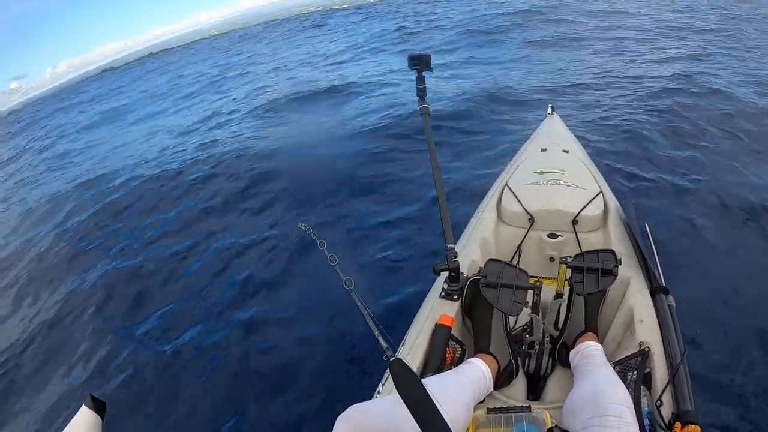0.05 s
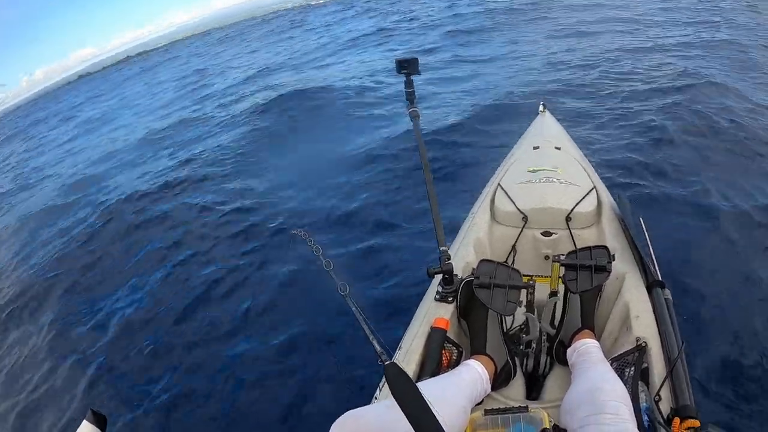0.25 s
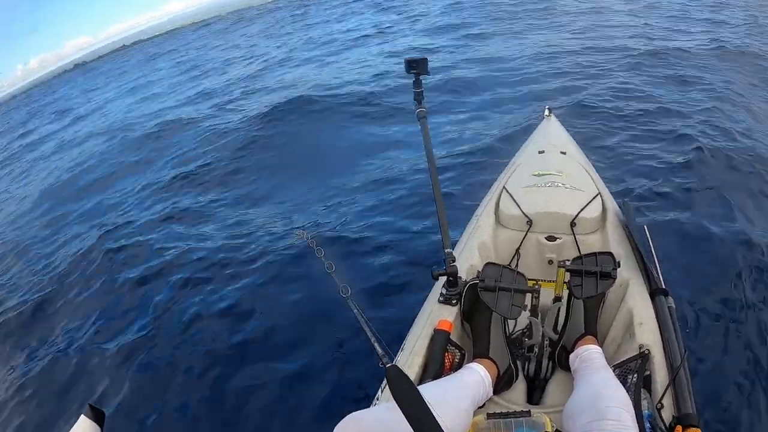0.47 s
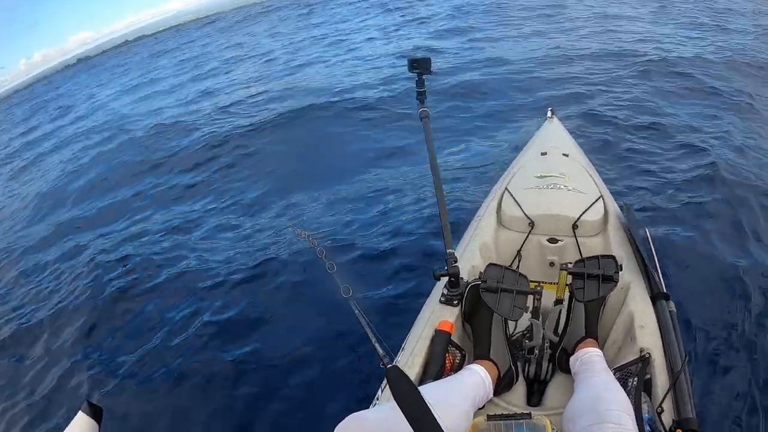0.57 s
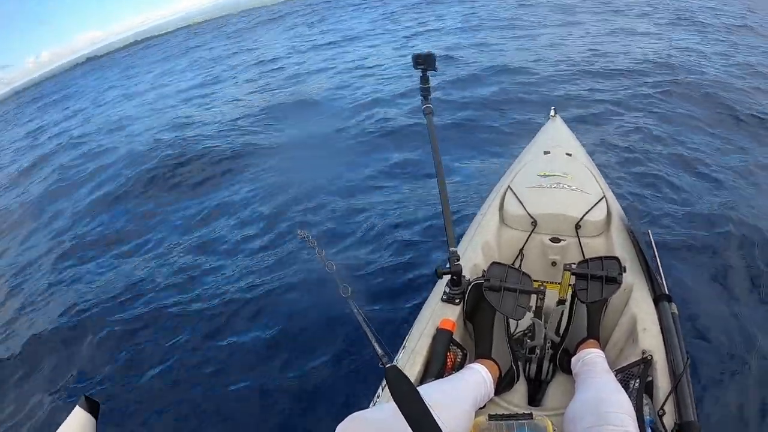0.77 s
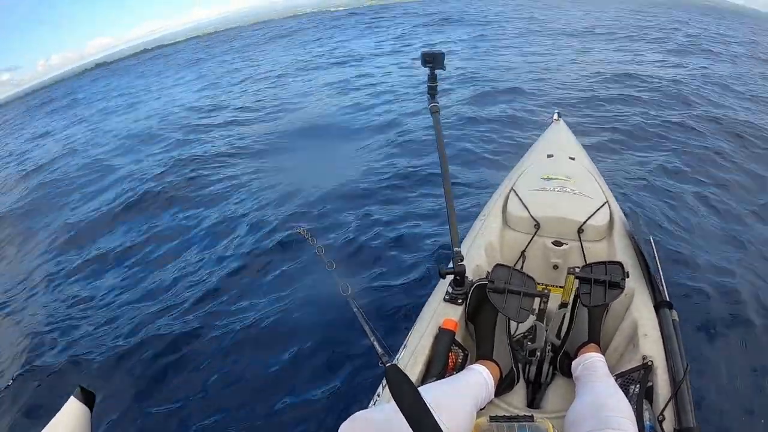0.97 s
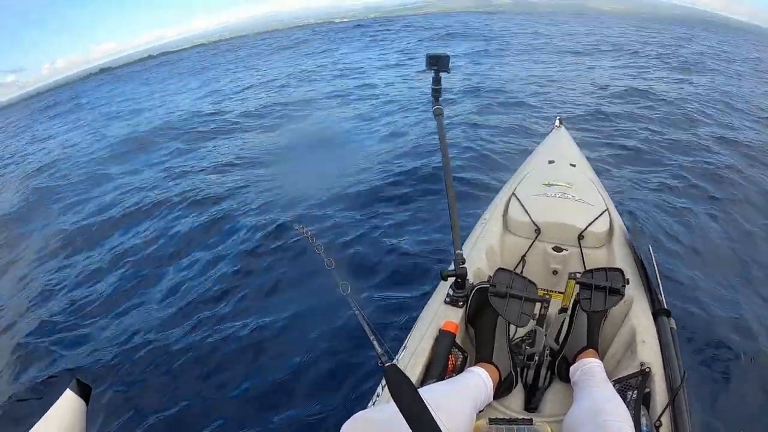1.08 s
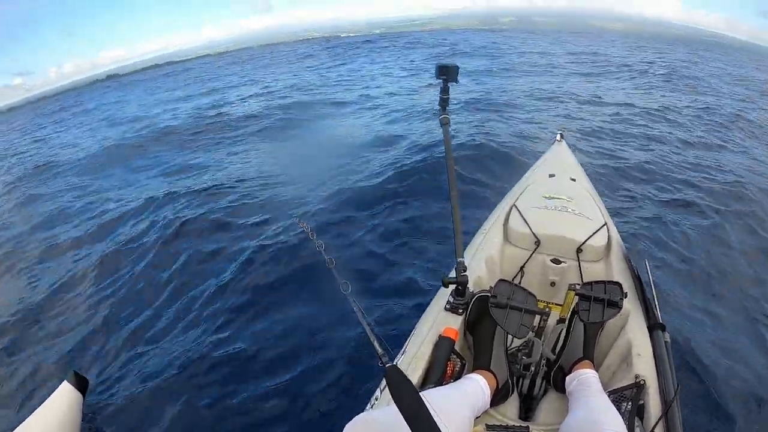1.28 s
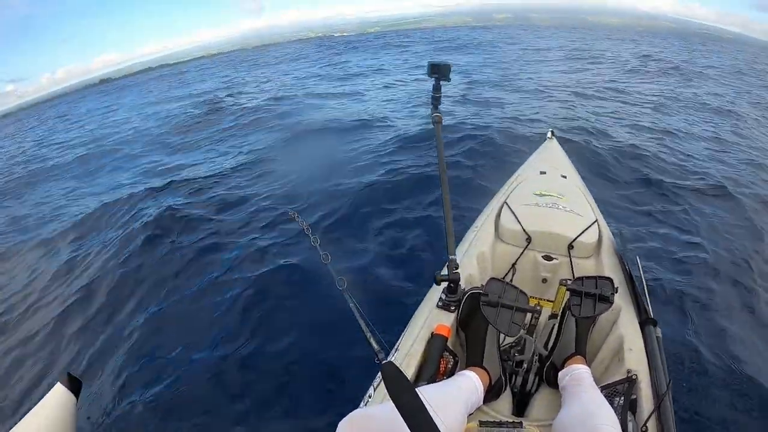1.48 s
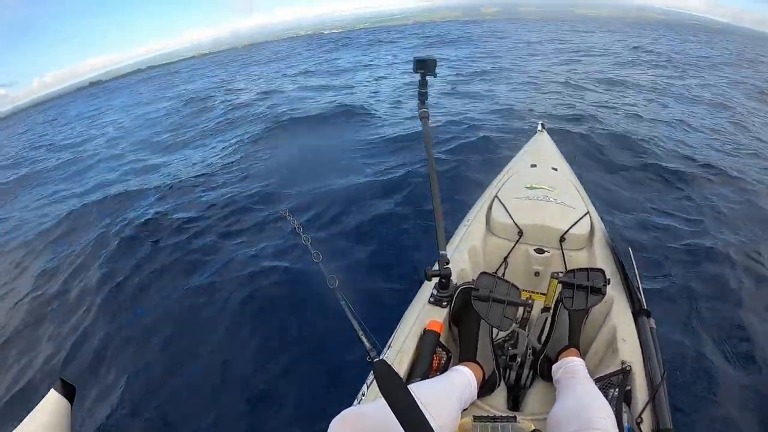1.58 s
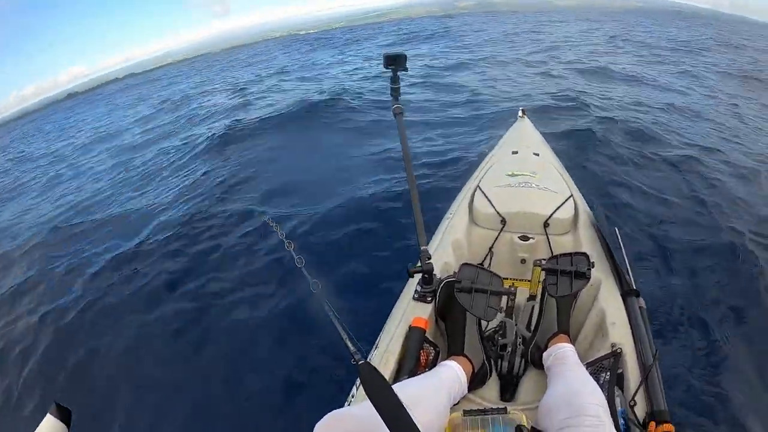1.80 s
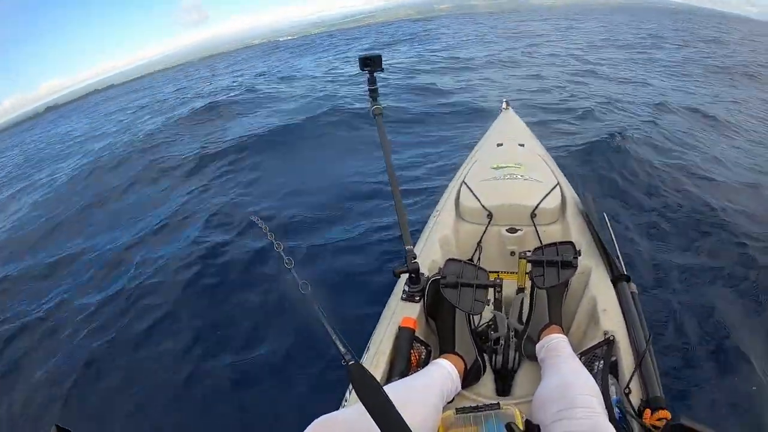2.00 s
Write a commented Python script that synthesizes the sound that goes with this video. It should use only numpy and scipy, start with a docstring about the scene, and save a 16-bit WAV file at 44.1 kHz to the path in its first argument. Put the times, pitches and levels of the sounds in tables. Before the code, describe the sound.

Water slaps and gurgles irregularly at a kayak's side while wind buffets the microphone

```python
"""Kayak on choppy sea

Wavelets lap a plastic hull on open sea, heard in stereo through two wind-buffeted microphone ports.
Trapped bubbles and rising air pockets sing as gliding sines; spray, droplet ticks and wind
are shaped noise. A thin fizz of tiny ringing bubbles lies over the wash and hiss of the sea,
and single eddies thump the ports as short low-pitched pulses."""
import sys
import numpy as np
from scipy import signal
from scipy.fft import rfft, irfft, next_fast_len
from scipy.io import wavfile
from scipy.ndimage import uniform_filter1d, map_coordinates

SR = 44100
rng = np.random.default_rng(int(sys.argv[2]) if len(sys.argv) > 2 else 0)


def to_linear_factor(level_db):
    """Convert decibel levels (scalar or array-like) to linear amplitude factors."""
    exponent = np.asarray(level_db, float) / 20
    return 10 ** exponent


def to_wav(sig):
    """Store sig (one row per channel, or 1-D mono) as 16-bit WAV at the path in sys.argv[1].

    Samples outside -1..1 are clipped; the rate is SR.
    """
    pcm = np.clip(np.atleast_2d(sig), -1, 1) * 32767
    pcm = np.round(pcm).astype(np.int16)
    wavfile.write(sys.argv[1], SR, pcm.T)  # frames by channels


N = 90404  # samples, about 2.05 s

# Ringing bubbles: t/s, starting f/Hz, nominal peak level/dB, 60 dB decay/s
BUBBLES = [(.004,1820,-35.5,0.04),(0.099,1140,-57.5,0.11),(0.1014,2950,-45.5,0.013),
           (.137,8300,-55,0.014),(.162,1537,-52,0.042),(0.1626,5950,-46,0.0077),(.227,2650,-57,0.042),
           (0.237,1352,-47.5,0.092),(0.287,6700,-61,0.0091),
           (0.391,2950,-55,0.015),(0.548,4080,-55.5,0.019),(0.651,3460,-53,0.015),(.660,2220,-56.5,0.071),
           (0.831,4830,-56,0.021),(.980,1400,-40.5,0.03),(1.04,2100,-35.5,0.014),
           (1.039,3250,-46.5,0.016),(1.077,3700,-41,0.011),(1.1,3880,-59,0.019),
           (1.187,2820,-59.5,0.027),(1.193,7200,-61.5,0.017),(1.307,5650,-57,0.012),(1.318,5200,-56,.008),(1.321,5490,-47,0.016),(1.345,4020,-56,.014),
           (1.416,8260,-47.5,0.0073),(1.43,3740,-54,0.054),(1.443,1730,-55.5,.02),(1.4468,3750,-50,0.012),(1.447,6700,-51,0.015),(1.48,1082,-36,0.053),
           (1.495,474,-35,0.028),(1.512,1412,-41,0.059),(1.53,1870,-47,0.017),(1.527,1086,-42.5,0.029),(1.572,382,-33,0.049),
           (1.634,1913,-49.5,0.045),(1.643,543,-38,0.029),(1.657,2460,-54.5,0.039),(1.661,5120,-39,0.0058),
           (1.669,7260,-44,0.013),(1.740,2080,-48.5,0.019),(1.816,2750,-58,0.013),(1.829,1280,-57.5,0.042),
           (1.846,3530,-58.5,0.024),(2.040,2010,-56,0.024)]
# Rising air pockets: t/s, length/s, start f/Hz, end f/Hz, nominal peak level/dB, bend (over 1 = speeds up)
AIR_POCKETS = [(0.968,0.072,573,1294,-48.5,0.95),(1.033,0.0046,1320,2600,-32,0.52),(1.090,0.038,1121,2700,-55,2.2),
               (1.156,0.037,764,905,-65,0.84),(1.395,0.0765,450,553,-50.5,0.48),(1.998,0.057,569,816,-55,1.33)]
# Splashes, bursts of dense spray: peak t/s, length/s, centre f/Hz, width/octaves, rms level at peak/dB
SPLASHES = [(.118,0.025,1940,0.58,-63.5),(.352,0.0093,1660,1.1,-49),(.375,0.06,3100,0.8,-68),(.975,0.017,1150,0.44,-55.5),
            (1.042,0.065,1790,0.33,-56),(1.085,0.024,4470,0.34,-67),(1.2,0.017,4500,0.21,-66),(1.36,0.074,3730,0.35,-70),
            (1.443,0.037,4650,0.6,-60.5),(1.485,0.018,1920,0.78,-54.5),(1.535,0.026,1650,0.59,-60),(1.575,0.057,1360,0.36,-65),
            (1.582,0.031,470,0.25,-45.5),(1.333,0.019,5050,0.47,-63),(1.648,0.019,640,1,-61),(1.741,0.016,1810,1.4,-66),(1.812,0.014,1530,0.57,-56.5)]
# Droplet ticks: t/s, peak level/dB, centre f/Hz
DROPLETS = [(.004,-41,3500),(0.1008,-49,3900),(.110,-63,9500),(0.1141,-43,2860),(.146,-53.5,3200),(.150,-59,9000),(0.1626,-41.5,4630),(.2273,-56.5,6350),
            (0.2386,-54,5240),(.286,-57.5,8000),(.3446,-48.5,5000),(0.3515,-40.5,2700),(.405,-72,8000),(0.5478,-51.5,5500),(0.5682,-66,8000),(0.6495,-57,5500),
            (.7187,-60,8000),(0.839,-56,10000),(0.8505,-59.5,7600),(0.9713,-62,2500),(1.0243,-51,5000),(1.0656,-49,4500),(1.072,-34,4040),
            (1.0827,-33.5,4850),(1.322,-59,9000),(1.330,-59,6950),(1.436,-55,6500),(1.481,-51.5,2600),
            (1.586,-56.5,8000),(1.627,-54,9400),(1.6353,-55,8550),(1.6496,-49.5,5000),(1.657,-46,4000),(1.752,-58.5,10500),(1.849,-52.5,7100),(1.8962,-57,6900),(1.9217,-52,8900),(1.9982,-49.5,5800),(2.0424,-56,8500)]
# Lapping activity that drives the fizz: t/s, base level/dB
LAPPING_LEVEL = [(0,-85.5),(.3,-84.5),(.42,-90.5),(.7,-85.5),(.95,-84.5),(1.1,-99),(1.25,-86.5),(1.4,-81.5),(1.55,-73.5),(1.7,-79),(1.9,-87.5),(2.05,-72)]
# Where along the hull the water laps: t/s, left minus right level/dB
HULL_PAN = [(0, 3), (.1, 3.5), (.39, 5.5), (.55, 0), (1.03, 3.5), (1.35, 3.5), (1.5, -3), (1.7, 4.5),
            (2.05, -1)]
# Single eddies that thump the ports: peak t/s, f/Hz, bell-shaped spread/s, peak level/dB
THUMPS = [(0.224,44.6,0.012,-34),(0.471,56.5,0.0075,-22.5),(0.725,54.7,0.01,-30),(0.867,49.8,0.018,-22),(0.915,60.4,0.0063,-17)]
# Wind buffeting: t/s, level/dB
WIND_LEVEL = [(0,-43),(.17,-43),(.22,-35.5),(.29,-47),(.35,-35),(.46,-32),(.53,-31),(.62,-32.5),(.68,-40.5),(.73,-37),(.79,-41),(.84,-33),
              (.92,-28.5),(.95,-34.5),(.98,-51.5),(1.1,-45),(1.2,-40.5),(1.35,-40),(1.42,-39.5),(1.48,-45),(1.57,-37),(1.66,-46),(1.72,-45.5),(1.9,-43.5),(2.05,-47.5)]
# Colour of the buffeting: f/Hz, relative level per Hz/dB
WIND_COLOUR = [(18,-8),(30,1.5),(45,-2),(64,-2),(90,-10.5),(130,-16),(200,-30),(400,-55)]
# Low wash of the sea: t/s, level/dB
WASH_LEVEL = [(0,-50.5),(.55,-48),(.9,-42.5),(1.1,-43),(1.45,-44),(1.7,-47),(2.05,-45.5)]
# Colour of the wash: f/Hz, relative level per Hz/dB
WASH_COLOUR = [(60,-19.5),(110,-0.5),(160,-0.5),(230,-7),(320,-16),(480,-28),(700,-47.5)]
# Broader hiss of the waves: t/s, level/dB
SURF_LEVEL = [(0,-77.5),(.3,-75),(.5,-67.5),(.8,-68.5),(1.05,-63),(1.25,-70.5),(1.55,-64.5),(1.8,-66),(2.05,-72)]
# Colour of the hiss: f/Hz, relative level per Hz/dB
SURF_COLOUR = [(350,0),(500,1.5),(800,-11.5),(1200,-6.5),(2200,-17),(4000,-22),(8000,-29.5),(15000,-51.5)]
# Likeness of the two ports in wind and sea noise: f/Hz, left-right correlation
PORT_LIKENESS = [(25, 0.068), (60, 0.13), (125, 0.83), (250, 0.9), (500, 0.66), (2000, 0.28), (5000, 0.1),
                 (10000, 0.035)]

# Bubble tones: attack, upward glide, and the water's shaking of pitch (share at 1 kHz) and level
ATTACK_CYCLES, CLIMB_OCT_PER_S = 1.37, 0.23
WOBBLE_AT_1KHZ, WOBBLE_HZ, FLUTTER_DB = 0.014, 349.6, 2.5
POCKET_FADE_DB, POCKET_EDGE_CYCLES = -6.5, 0.45
SPLASH_RISE_TO_FALL, SPLASH_GRAIN_DB, SPLASH_GRAIN_PER_S = 0.82, 6.5, 500
TICK_T60_S, TICK_OCTAVES, TICK_TAIL_T60_S, TICK_TAIL_DB = 0.0038, 0.59, 0.046, -16
FIZZ_PER_S, FIZZ_GAIN_DB, FIZZ_SPREAD_DB = 900, 8.5, 3.72
FIZZ_LOW_HZ, FIZZ_OCTAVES, FIZZ_MIN_CYCLES, FIZZ_TILT_DB_PER_OCT = 551.3, 4.1, 10.2, -0.28
PAN_SCATTER_DB, PORT_LAG_SPREAD_S = 2.5, 3.5e-5


def bubbles(rough):
    """Air trapped under the hull rings at the pitch of each bubble and dies away."""
    out = np.zeros((2, N))
    for s, hz, db, t60 in BUBBLES:
        add(out, s, to_linear_factor(db) * ring(hz, t60, rough))
    return out


def air_pockets(rough):
    """Larger pockets of air climb in pitch as they rise, fading slightly on the way."""
    out = np.zeros((2, N))
    for s, length, start_hz, end_hz, db, bend in AIR_POCKETS:
        progress = np.arange(int(length * SR)) / (length * SR)
        to_nearest_end = np.minimum(progress, 1 - progress)
        edge = np.minimum(1, to_nearest_end * length * start_hz / POCKET_EDGE_CYCLES)
        pitch = start_hz * (end_hz / start_hz) ** (progress ** bend)
        add(out, s, to_linear_factor(db + POCKET_FADE_DB * progress) * edge * tone(pitch, rough))
    return out


def splashes():
    """Dense spray: grainy band-passed noise that swells fast and dies away."""
    out = np.zeros((2, N))
    grain = to_linear_factor(SPLASH_GRAIN_DB * walk(SPLASH_GRAIN_PER_S))
    t = np.arange(-4096, 8192) / SR  # 0 at the peak
    for k, (s, length, hz, octaves, db) in enumerate(SPLASHES):
        own_grain = grain[k * 3500:][:len(t)]
        spray = bell(rng.standard_normal(len(t)) * own_grain, hz, octaves)
        swell = np.exp(np.where(t < 0, t / SPLASH_RISE_TO_FALL, -t) * 2 / length)
        add(out, s + t[0], to_linear_factor(db) * swell * spray / spray.std())
    return out


def droplet_ticks():
    """Each droplet is a sharp noisy click with a faint spray behind it."""
    out = np.zeros((2, N))
    t = np.arange(4096) / SR
    click_decay = np.exp(-np.log(1000) * t / TICK_T60_S)
    spray_decay = to_linear_factor(TICK_TAIL_DB) * np.exp(-np.log(1000) * t / TICK_TAIL_T60_S)
    for s, db, hz in DROPLETS:
        noise = rng.standard_normal(len(t))
        click = bell(noise, hz, TICK_OCTAVES) * (click_decay + spray_decay)
        add(out, s, to_linear_factor(db) * click / np.abs(click).max())
    return out


def fizz(rough):
    """Many tiny bubbles of random pitch, strength and decay; louder where the lapping is busy."""
    out = np.zeros((2, N))
    for when, height, weakness, sustain in rng.random((int(FIZZ_PER_S * N / SR), 4)):
        s = when * N / SR
        octave = FIZZ_OCTAVES * height
        hz = FIZZ_LOW_HZ * 2 ** octave
        strength_db = -FIZZ_SPREAD_DB * np.log(weakness + 0.031)  # a few stand far out
        db = table(LAPPING_LEVEL, 1, s) + FIZZ_GAIN_DB + strength_db + FIZZ_TILT_DB_PER_OCT * octave
        t60 = FIZZ_MIN_CYCLES * (1 + 4 * sustain ** 2) / hz
        add(out, s, to_linear_factor(db) * ring(hz, t60, rough))
    return out


def eddy_thumps(t):
    """Single eddies push the ports: bell-shaped low pulses, up to a quarter cycle apart in phase."""
    out = np.zeros((2, N))
    for s, hz, spread, db in THUMPS:
        pulse = np.exp(-.5 * ((t - s) / spread) ** 2)
        cycles = hz * (t - s) + rng.random((2, 1)) / 4
        out += to_linear_factor(db) * pulse * np.cos(2 * np.pi * cycles)
    return out


def wind(t):
    """Gusts buffet the ports as low, flickering turbulence."""
    return to_linear_factor(table(WIND_LEVEL, 1, t)) * turbulence(WIND_COLOUR, flicker_db=1.0, rate=18.83)


def sea(t):
    """The sea lays a low wash and a broader wave hiss underneath."""
    wash = to_linear_factor(table(WASH_LEVEL, 1, t)) * turbulence(WASH_COLOUR, flicker_db=3.0, rate=25.)
    hiss = to_linear_factor(table(SURF_LEVEL, 1, t)) * turbulence(SURF_COLOUR, flicker_db=5.0, rate=36.0)
    return wash + hiss


def ring(hz, t60, rough):
    """A bubble's voice: a quickly rising, decaying tone whose pitch climbs."""
    t = np.arange(int(t60 * SR) + 8) / SR
    attack = np.minimum(1, t * hz / ATTACK_CYCLES)
    decay = np.exp(-np.log(1000) * t / t60)
    return attack * decay * tone(hz * 2 ** (CLIMB_OCT_PER_S * t), rough)


def tone(hz, rough):
    """A sine along a pitch track, shaken by the water around it; higher pitches waver more."""
    n = np.arange(len(hz))
    pitch_start, level_start = rng.integers(0, N // 2, 2)
    wobble = WOBBLE_AT_1KHZ * np.sqrt(hz / 1000) * rough[pitch_start + n]
    shaken_hz = np.minimum(hz * (1 + wobble), .45 * SR)
    phase = 2 * np.pi * np.cumsum(shaken_hz) / SR
    return np.sin(phase) * to_linear_factor(FLUTTER_DB * rough[level_start + n])


def turbulence(colour, flicker_db, rate):
    """Noise bands half an octave apart, each flickering alone, part shared by both ports; mono rms 1."""
    out, padded = 0, next_fast_len(N)
    lo, hi = colour[0][0], colour[-1][0]
    for hz in lo * 2 ** np.arange(0, np.log2(hi / lo), .5):
        likeness = np.clip(table(PORT_LIKENESS, 1, hz, log=True), 0, .99)
        mid, side = bell(rng.standard_normal((2, padded)), hz, .25)[:, :N]
        pair = np.sqrt(1 + likeness) * mid + np.sqrt(1 - likeness) * side * np.array([[1], [-1]])
        band_db = table(colour, 1, hz, log=True) + flicker_db * walk(rate)
        out = out + to_linear_factor(band_db) * pair
    return out / np.sqrt(np.mean(out.mean(0) ** 2))


def add(out, s, sound):
    """Mix in a sound at s seconds from its place along the hull, reaching the ports a little apart."""
    pan_db = table(HULL_PAN, 1, s) + PAN_SCATTER_DB * rng.standard_normal()
    lag = PORT_LAG_SPREAD_S * SR * rng.standard_normal()  # samples
    i = max(int(s * SR), 0)
    n = max(min(len(sound), N - i), 0)
    for ch, sign in enumerate((.5, -.5)):
        delayed = map_coordinates(sound, [np.arange(n) - sign * lag], order=3)
        out[ch, i:i + n] += to_linear_factor(sign * pan_db) * delayed


def walk(rate):
    """Random levels held 1 / rate s and slewed twice; spread near 1."""
    k = int(SR / rate)
    steps = np.repeat(rng.standard_normal(N // k + 1), k)
    return 1.3 * uniform_filter1d(uniform_filter1d(steps, k), k)[:N]


def bell(x, hz, octaves):
    """Band-pass that is bell-shaped on a log-frequency axis."""
    n = x.shape[-1]
    f = np.arange(n // 2 + 1) * SR / n + 1  # + 1 keeps the log finite
    return irfft(rfft(x) * np.exp(-.5 * (np.log2(f / hz) / octaves) ** 2), n)


def table(rows, col, x, log=False):
    """Read one column of a table along its first."""
    a = np.array(rows, float)
    if log:
        return np.interp(np.log(x), np.log(a[:, 0]), a[:, col])
    return np.interp(x, a[:, 0], a[:, col])


def scene():
    """Lapping at the hull, wind on the ports and the sea, all together."""
    t = np.arange(N) / SR
    rough = walk(WOBBLE_HZ)  # the water's unrest, shared by all bubble tones
    lapping = bubbles(rough) + air_pockets(rough) + splashes() + droplet_ticks() + fizz(rough)
    return lapping + eddy_thumps(t) + wind(t) + sea(t)


def top_cut(x):
    """Nothing passes above the cut-off."""
    return signal.sosfilt(signal.butter(12, 15780, fs=SR, output="sos"), x)


def record(dry):
    """Deliver the finished mix."""
    return top_cut(dry)


dry = scene()
out = record(dry)
to_wav(out)
```